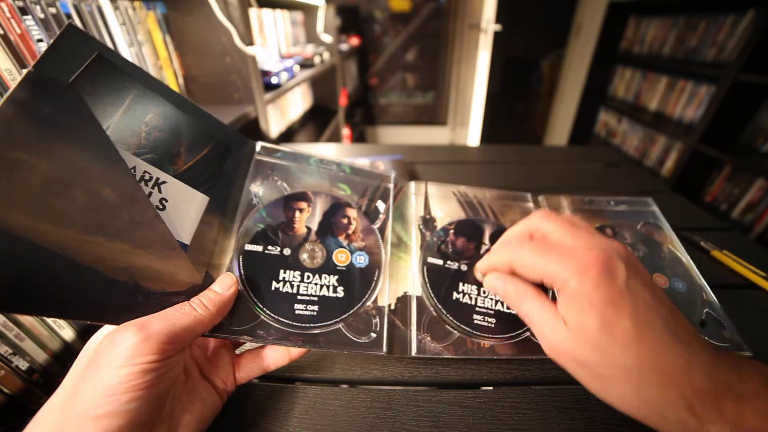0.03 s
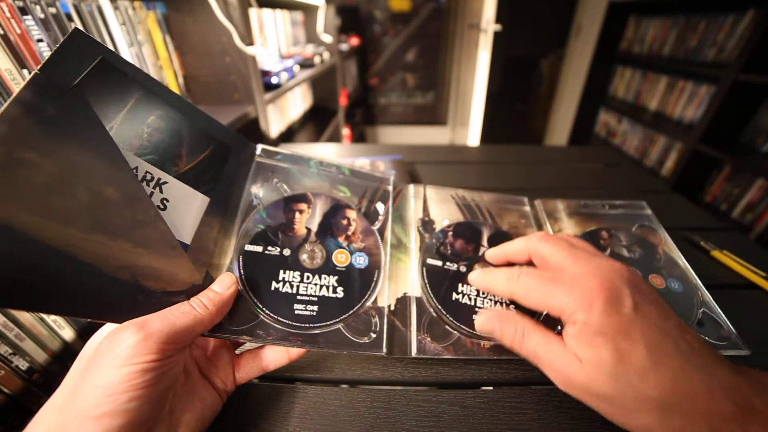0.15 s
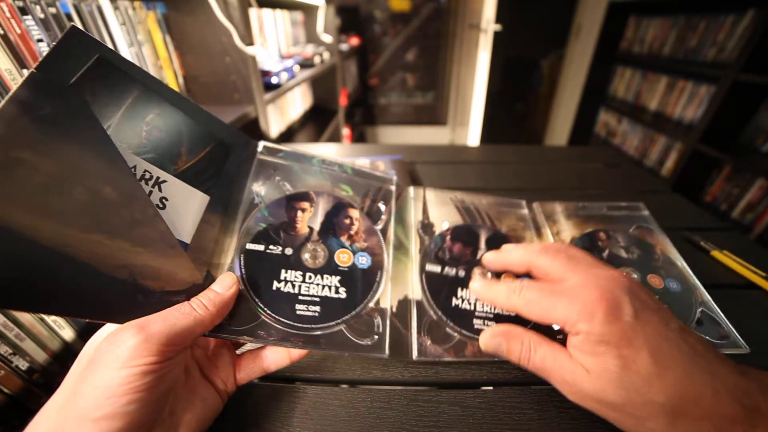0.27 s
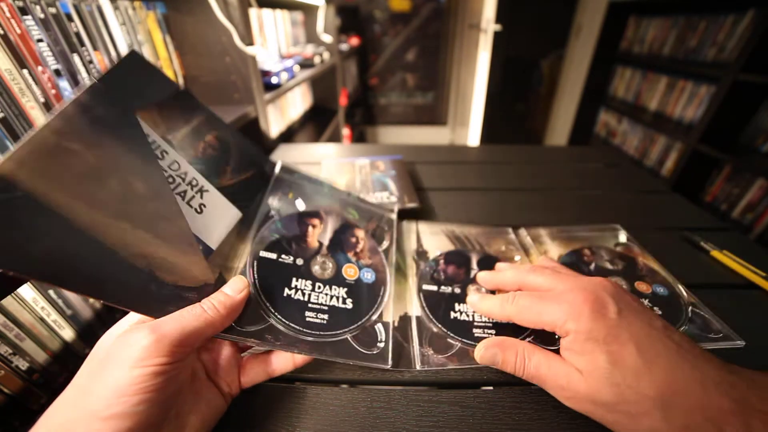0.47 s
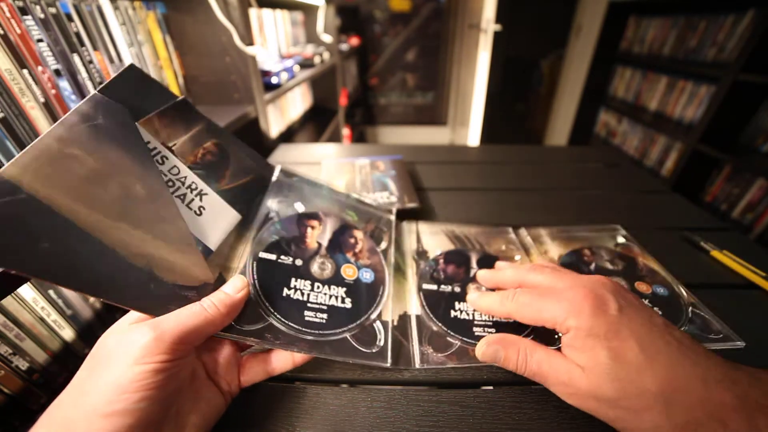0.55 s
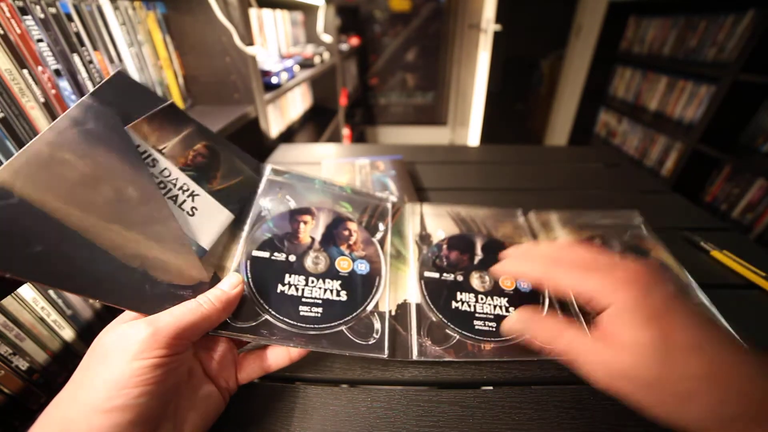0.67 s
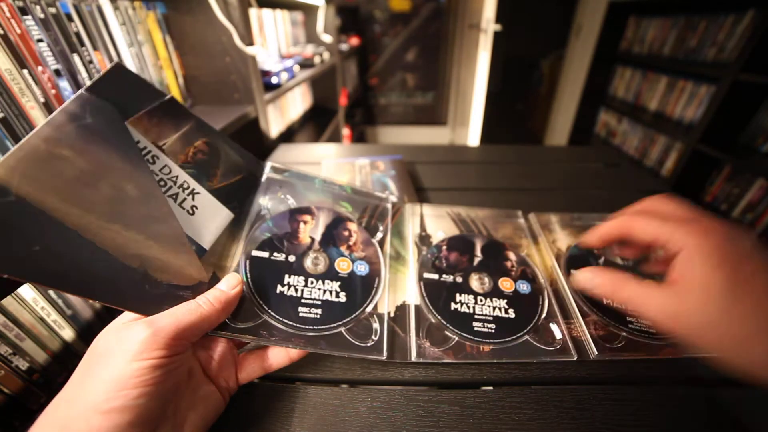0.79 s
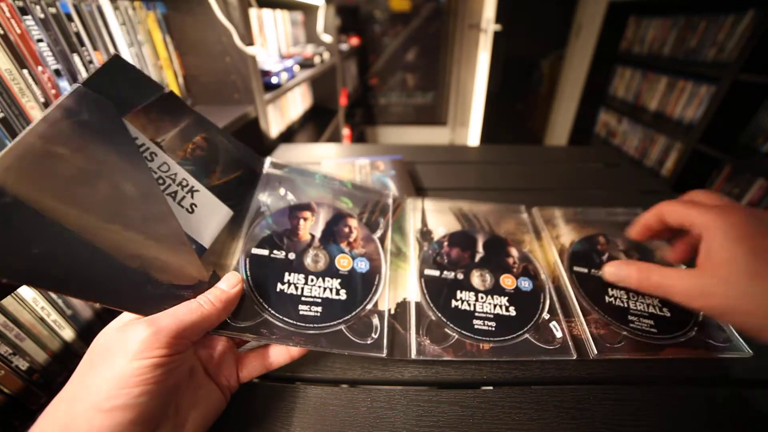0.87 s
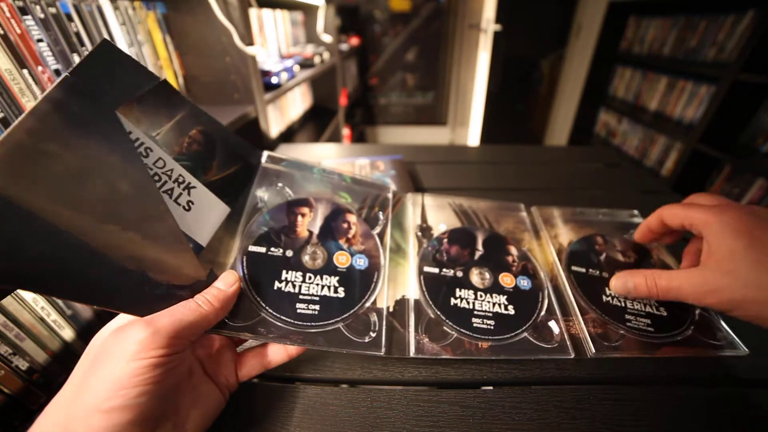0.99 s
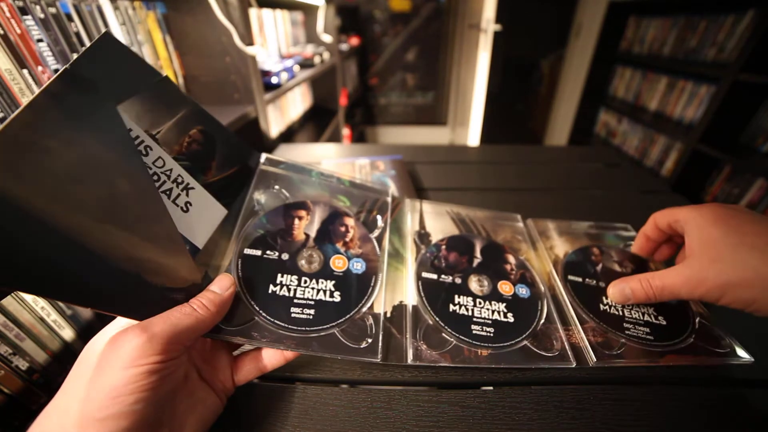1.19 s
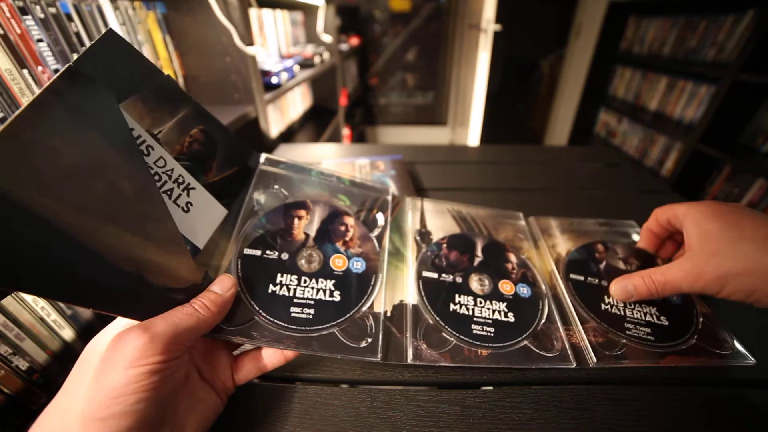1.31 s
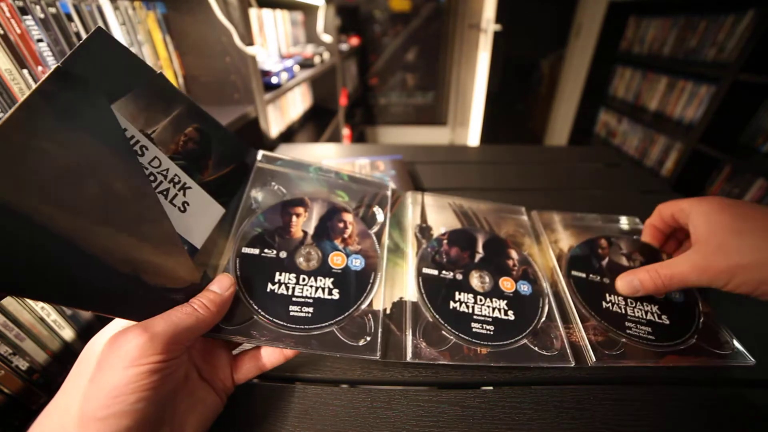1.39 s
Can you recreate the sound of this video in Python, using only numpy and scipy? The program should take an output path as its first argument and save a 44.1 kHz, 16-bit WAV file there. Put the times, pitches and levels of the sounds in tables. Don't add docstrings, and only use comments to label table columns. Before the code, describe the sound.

Hard plastic disc trays clack in a folding case: one very loud sharp snap, a weaker rattly one, then a faint one, with ticks, soft table knocks and skin rubbing card, close microphone, quiet room.

```python
import sys
import numpy as np
from scipy import signal
from scipy.fft import rfft, irfft
from scipy.io import wavfile
from scipy.ndimage import uniform_filter1d

SR = 44100
rng = np.random.default_rng(int(sys.argv[2]) if len(sys.argv) > 2 else 0)


def invert_db(x):
    u = np.asarray(x, float) / 20
    return 10 ** u


def wav_out(sig):
    wavfile.write(sys.argv[1], SR, np.round(np.clip(np.atleast_2d(sig).T, -1, 1) * 32767).astype(np.int16))


N = 63945
FILTER_HZ = np.fft.rfftfreq(2048, 1 / SR)


def evened(x):
    return x / np.sqrt(np.mean(x ** 2) + 1e-20)


def read(points, hz):
    f, value = np.transpose(points)
    return np.interp(np.log(hz + 1), np.log(f + 1), value)


def add(mix, start_s, sound):
    part = mix[round(start_s * SR):][:len(sound)]
    part += sound[:len(part)]


def colour(gain_db):
    log = np.log(invert_db(np.maximum(gain_db, -100)))
    log = np.r_[log, log[-2:0:-1]]
    minimum_phase = -signal.hilbert(log).imag
    return np.fft.ifft(np.exp(log + 1j * minimum_phase)).real[:1024]


def dying(t, t60):
    return invert_db(-60 * t / t60)


def ring(modes):
    t = np.arange(6000) / SR
    out = np.zeros(6000)
    for hz, db, t60 in modes:
        soft_start = np.minimum(t * hz / 1.286, 1)
        out += invert_db(db) * dying(t, t60) * np.sin(2 * np.pi * hz * t) * soft_start
    return out


def grains(count, per_s):
    spread_db = 3.0
    chance, side, size = rng.random((3, count))
    happens = chance < per_s / SR
    return happens * np.sign(side - .5) * invert_db(-spread_db * np.log(size + 0.038))


def chatter(t60, rise_s):
    t = np.arange(3000) / SR
    rattle = grains(3000, 10000) * dying(t, t60) * np.minimum(t / rise_s, 1)
    rattle[round(rise_s * SR)] += 2.2
    return rattle / 2.374


# (f/Hz, level/dB)
AIR_CURVE = [(15, -31.5), (25, 4), (149, 7.5), (335, -1), (516, -8.5), (796, -1.5), (1290, -7.5),
             (6210, -11.5), (16000, -20.5)]


def air():
    noise = rfft(rng.standard_normal(N))
    shaped = irfft(noise * invert_db(read(AIR_CURVE, np.fft.rfftfreq(N, 1 / SR))), N)
    return invert_db(-64) * evened(shaped)


# (f/Hz, t60/s)
ECHO_TIMES = [(200, 0.19), (1000, .25), (4000, 0.067), (10000, 0.063)]


def room(x):
    taps = np.zeros(SR // 2)
    at = np.arange(200, SR // 2 - 20, 20)
    taps[at + rng.integers(0, 20, len(at))] = rng.choice([-1., 1.], len(at))
    hz, t, z = signal.stft(taps, SR, nperseg=256)
    fade = dying(t, read(ECHO_TIMES, hz)[:, None])
    tail = signal.istft(z * fade, SR, nperseg=256)[1]
    return signal.fftconvolve(x, tail / np.linalg.norm(tail))[:N]


# (f/Hz, level/dB)
MIC_CURVE = [(20, -38.5), (60, -13), (100, 1), (9500, 0), (12500, -0.5), (16000, -12)]


def microphone(x):
    return signal.oaconvolve(x, colour(read(MIC_CURVE, FILTER_HZ)))[:N]


# (peak t/s, rise/s, fall/s, level/dB, tilt/dB per octave)
STROKES_OF_HAND = [(.001, .05, 0.16, -50, -1.2), (0.217, 0.027, 0.16, -53, -5.7),
                   (.295, 0.13, 0.052, -45, 2.5), (.355, 0.051, 0.076, -41, 1.2),
                   (.43, .05, .12, -57, -4.6), (.625, 0.14, 0.1, -50.5, -0.7),
                   (0.763, 0.013, 0.028, -53, -2.9), (.93, 0.11, 0.16, -48, -1.9),
                   (.99, 0.043, 0.027, -51, 3.3), (1.105, 0.059, 0.092, -38.5, 2),
                   (1.187, 0.035, 0.035, -49.5, -2.4), (1.254, 0.041, .04, -66, -0.5),
                   (1.309, 0.038, 0.078, -42.5, -1.9), (1.375, 0.066, 0.18, -56, -3.9)]
# (f/Hz, level/dB per Hz)
RUB_CURVE = [(180, -37.5), (300, -10), (528, -11.5), (1030, -6.5), (1390, -8), (2170, -3), (2980, -3),
             (7200, -2), (16000, -34.5)]


def rubbing():
    t = np.arange(N) / SR
    slips = grains(N, 10000)
    flutter = invert_db(1.8 * evened(uniform_filter1d(rng.standard_normal(N), 250)))
    out = np.zeros(N)
    for peak_s, rise_s, fall_s, db, tilt_db in STROKES_OF_HAND:
        away = np.where(t < peak_s, (peak_s - t) / rise_s, (t - peak_s) / fall_s)
        taps = colour(read(RUB_CURVE, FILTER_HZ) + tilt_db * np.log2((FILTER_HZ + 100) / 4000))
        stroke = evened(signal.oaconvolve(slips * flutter, taps)[:N])
        out += invert_db(db - 20 * away ** 1.21) * stroke
    return out


# (t/s, peak level/dB, ring f/Hz, chatter t60/s, tilt/dB per octave)
SMALL_TICKS = [(.105, -40, 3220, 0.13, 2.5), (.292, -30.5, 5700, .04, -3), (0.3145, -31.5, 7100, .02, .3),
               (.322, -32, 6160, 0.012, 2), (.333, -28, 1450, 0.065, -4), (0.337, -24, 7800, .03, 1.6),
               (0.342, -26.5, 2540, 0.046, -1), (.3665, -31, 2980, 0.0087, -7.5),
               (0.3887, -24.5, 5680, 0.055, -7.5), (0.4212, -32.5, 5870, 0.041, 2),
               (0.4457, -40.5, 6130, 0.022, 2.5), (.453, -34.5, 6000, 0.0091, -4.9),
               (.478, -42, 3030, 0.068, 3),
               (.5565, -52, 7650, .03, -6), (0.5739, -36.5, 5600, 0.013, -1.5),
                   (.5898, -34, 1490, 0.027, -6), (.6555, -36.5, 6250, 0.021, 2.5),
                   (0.7399, -34, 3950, 0.1, -4.5), (.751, -38, 3100, 0.086, 9),
                   (0.9152, -27.5, 1910, 0.043, 1.5), (0.9645, -27, 4100, 0.033, 2),
                   (.9765, -31.5, 7460, 0.052, 2), (1.179, -31, 3230, 0.048, 3),
                   (1.2443, -43, 1710, 0.078, -1), (1.2784, -27, 3600, 0.052, 0.1),
                   (1.298, -31, 2950, 0.063, -2)]


def ticks():
    ring_db, ring_width_hz, rise_s, trim_db = 1, 400, .0005, -1.5
    out = np.zeros(N)
    for start_s, db, ring_hz, t60, tilt_db in SMALL_TICKS:
        peak = invert_db(ring_db + 6) / np.abs(1 + 2j * (FILTER_HZ - ring_hz) / ring_width_hz)
        gain_db = 1.1 * read(RUB_CURVE, FILTER_HZ) + 20 * np.log10(1 + peak)
        gain_db += tilt_db * np.log2((FILTER_HZ + 300) / 4000)
        tick = signal.oaconvolve(chatter(t60, rise_s), colour(gain_db))
        add(out, start_s, invert_db(db + trim_db) * tick / abs(tick).max())
    return out


# (t/s,
# peak level/dB, f/Hz, t60/s)
TABLE_KNOCKS = [(.2375, -25.5, 580, 0.023), (.2405, -15, 720, 0.024), (.241, -22, 910, 0.023),
                (0.241, -30.5, 244, 0.045), (0.241, -33.5, 97, 0.052), (0.332, -38.5, 108, 0.1),
                (0.336, -44.5, 333, 0.14), (.389, -27.5, 341, 0.032), (0.389, -41, 110, 0.054),
                (.42, -45, 151, 0.11), (.574, -44.5, 500, .02), (0.592, -51, 1470, 0.022),
                (1.3244, -25.5, 1810, 0.045), (0.5903, -48, 964, 0.036), (.591, -41.5, 463, 0.029),
                (0.742, -36.5, 108, 0.043), (.741, -48, 610, 0.05), (0.8757, -38, 134, 0.14),
                (0.877, -65, 341, 0.23), (.874, -57, 575, 0.013), (.875, -33, 980, 0.055),
                (1.277, -49.5, 134, 0.13), (1.28, -46.5, 400, 0.043), (1.324, -46, 113.4, 0.18),
                (1.323, -40.5, 330, 0.039), (1.324, -34, 703, 0.039)]


def knocks():
    spread, side_db = 0.14, -7
    out = np.zeros(N)
    for start_s, db, hz, t60 in TABLE_KNOCKS:
        above, below = 1 + spread * (1 + rng.random(2))
        main = (hz, db, t60)
        upper = (hz * above, db + side_db, 0.93 * t60)
        lower = (hz / below, db + side_db, 0.52 * t60)
        add(out, start_s, ring([main, upper, lower]))
    return out


# (t/s, peak level/dB, chatter t60/s, crack over ring level/dB)
FIRST_SNAP = [
    (.2402, -23, 0.0034, 11),
    (.2413, -0.5, 0.0066, -6.5),
    (.2434, -8.5, 0.0029, -4),
    (.2446, 0, 0.003, -12.5),
    (.2462, -6, 0.013, -4),
    (.2485, -14, 0.025, 7),
    (.256, -21, 0.066, 2.5),
]
SECOND_SNAP = [
    (.8702, -31.5, 0.05, 11),
    (.8734, -10, 0.017, -5.5),
    (.8746, -13.5, 0.051, -3),
    (.8793, -11, 0.02, -6.5),
    (.8832, -14, 0.041, 0),
    (.895, -23, 0.062, 21),
]
THIRD_SNAP = [
    (1.3222, -25, .01, 1),
    (1.3238, -21.5, .012, -1),
    (1.3253, -20, .03, 2),
    (1.3325, -27, .045, 4),
]
# (f/Hz, level/dB, t60/s)
FIRST_TRAY = [(1380, -15.5, .02), (2090, -5, .015), (3000, 2.5, .012), (3726, 7, 0.0045),
              (4580, -19, 0.0076), (5696, -16, .008), (6230, 5.5, 0.014), (6580, 5.5, 0.017),
              (7060, -4, 0.014), (9150, 1.5, 0.0059), (11100, -54, 0.0079)]
SECOND_TRAY = [(1950, -9.5, 0.014), (2500, -4.5, 0.01), (3680, 6, 0.0053), (4070, -0.5, .007),
               (5290, -8.5, 0.0097), (5530, -14, 0.0031), (6330, 6, 0.0095), (7400, 4.5, 0.0087),
               (8560, -8, 0.0087), (8980, -6.5, 0.0066)]
THIRD_TRAY = [(2150, -4, .008), (3000, -8, .008), (3790, -3, .01), (4500, -3, .008), (6320, -6, .008),
              (7413, 0, .011)]


def snap(contacts, modes):
    crack_t60, crack_rise_s = .006, .0002
    t = np.arange(800) / SR
    out = np.zeros(N)
    top = abs(ring(modes)).max()
    taps = colour(read(RUB_CURVE, FILTER_HZ))
    for start_s, db, t60, crack_db in contacts:
        spot = rng.standard_normal((len(modes), 2))
        moved = [(hz * (1 + 0.02 * a), level + 0.85 * b, fade)
                 for (hz, level, fade), (a, b) in zip(modes, spot)]
        body = ring(moved) / top
        burst = rng.standard_normal(800) * dying(t, crack_t60) * np.minimum(t / crack_rise_s, 1)
        crack = np.convolve(burst, taps)
        add(body, 0, invert_db(crack_db) * crack / abs(crack).max())
        blow = signal.oaconvolve(chatter(t60, .0001), body)
        add(out, start_s, invert_db(db) * blow / abs(blow).max())
    return out


def scene():
    snaps = snap(FIRST_SNAP, FIRST_TRAY) + snap(SECOND_SNAP, SECOND_TRAY) + snap(THIRD_SNAP, THIRD_TRAY)
    near = microphone(snaps + ticks() + rubbing())
    echo = invert_db(-20) * room(near)
    return (near + echo + knocks() + air())[None]


def roll_off(x):
    return signal.sosfilt(signal.butter(12, 16440, fs=SR, output="sos"), x)


def record(dry):
    mix = np.clip(dry, -.94, .94)
    return roll_off(mix)


dry = scene()
out = record(dry)
wav_out(out)
```